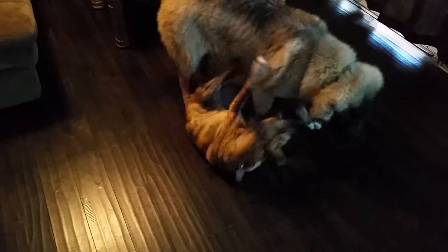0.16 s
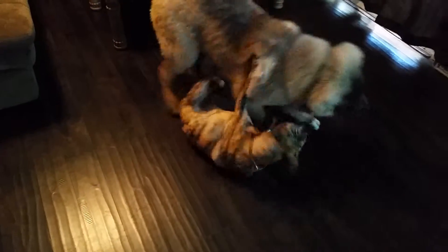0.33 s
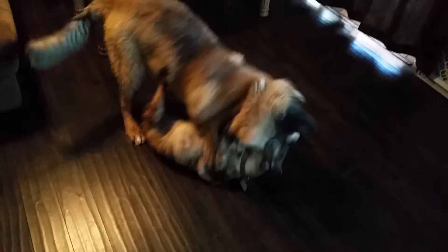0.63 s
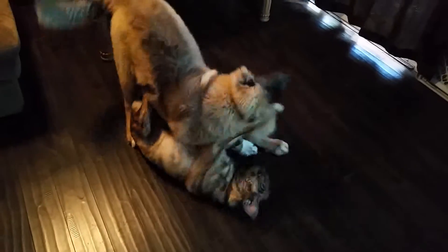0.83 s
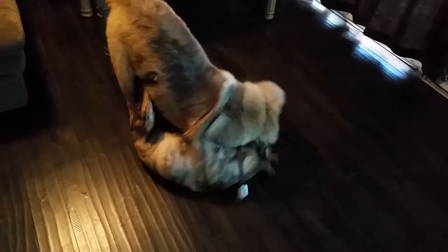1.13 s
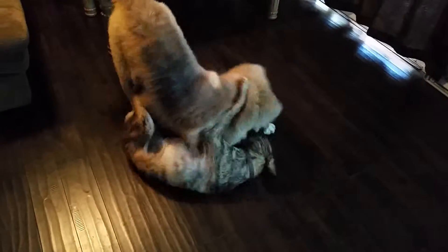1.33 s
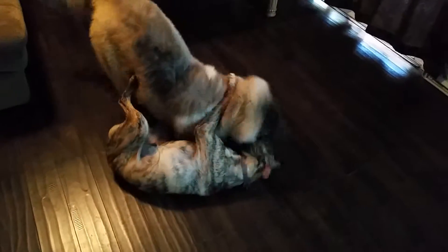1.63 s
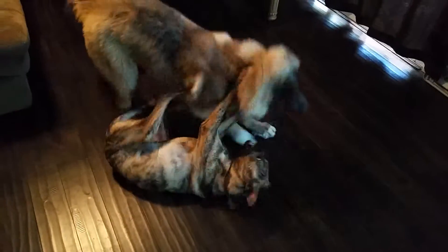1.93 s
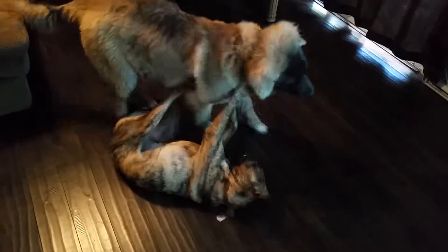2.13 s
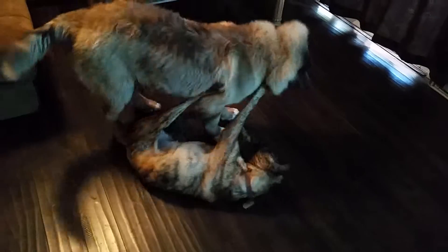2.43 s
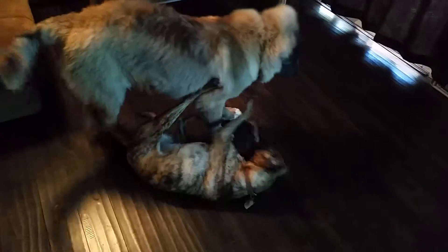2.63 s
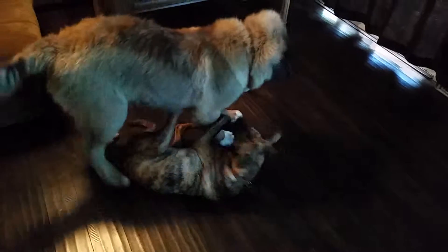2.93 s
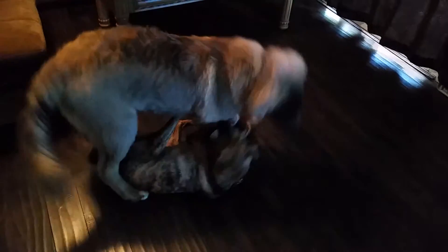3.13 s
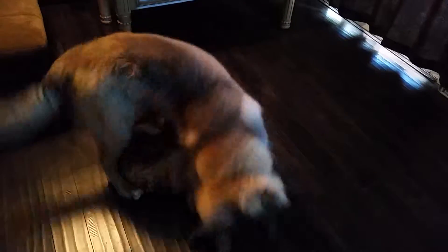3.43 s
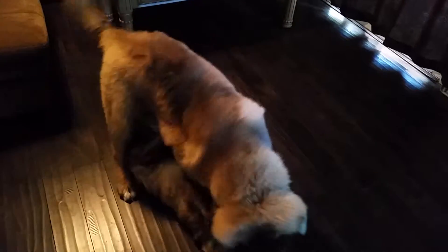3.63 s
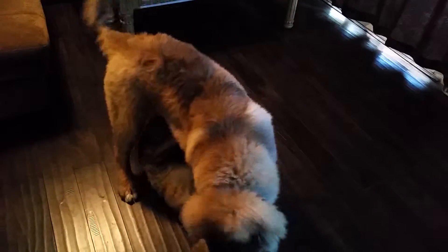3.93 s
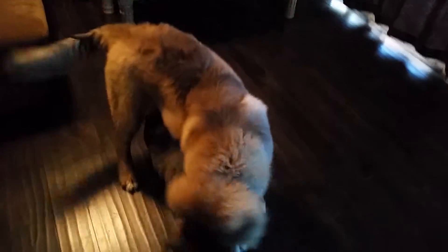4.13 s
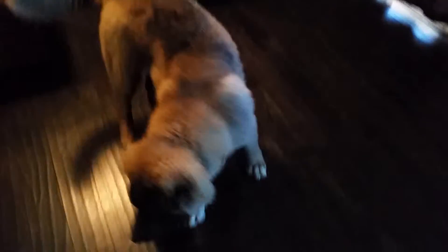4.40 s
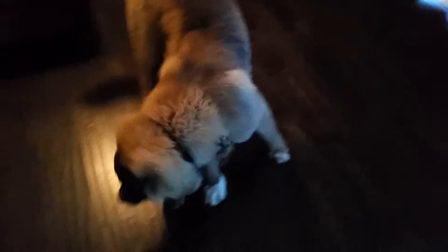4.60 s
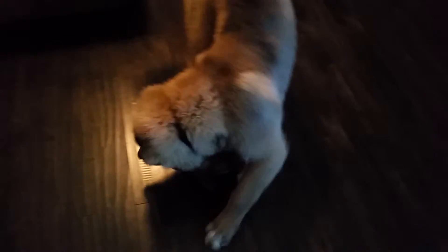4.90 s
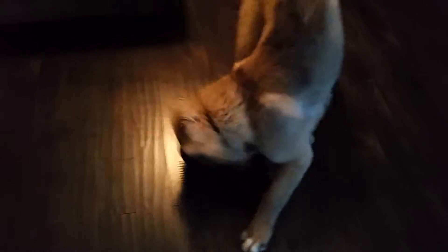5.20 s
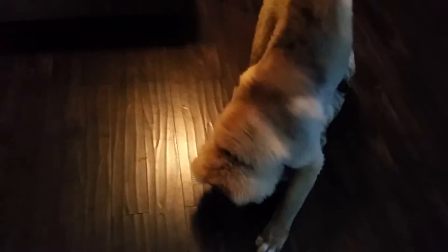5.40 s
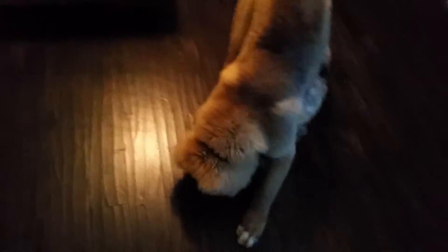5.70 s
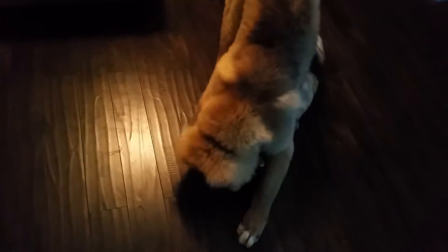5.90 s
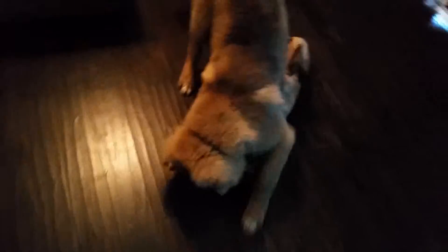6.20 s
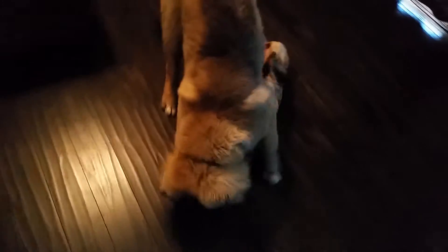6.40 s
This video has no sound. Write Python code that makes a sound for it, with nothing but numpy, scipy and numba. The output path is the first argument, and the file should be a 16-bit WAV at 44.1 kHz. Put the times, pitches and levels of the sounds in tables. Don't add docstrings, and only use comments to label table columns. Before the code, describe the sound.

Two puppies growl in rough, throaty bursts while wrestling on a wooden floor, with metal collar tags clinking, claws ticking and scraping, and soft body thumps.

```python
import sys
import numpy as np
from scipy import signal
from scipy.fft import rfft, irfft
from scipy.io import wavfile
from scipy.ndimage import uniform_filter1d
from numba import njit

SR = 44100
rng = np.random.default_rng(int(sys.argv[2]) if len(sys.argv) > 2 else 0)


def gain_from_db(level_db):
    decades = np.asarray(level_db, float) / 20
    return 10 ** decades


def log_audio(samples):
    frames = np.atleast_2d(samples).T
    limited = np.clip(frames, -1, 1)
    pcm = np.round(limited * 32767).astype(np.int16)
    wavfile.write(sys.argv[1], SR, pcm)


N = 288855
T = np.arange(N) / SR
SLOW = T[::64]


def vocal_folds():
    # time in seconds, level in dB.
    efforts = [
        [(0.24, -71.5), (0.256, -37), (0.304, -22), (0.566, -21), (0.618, -32), (0.666, -17.5), (0.82, -44)],
        [(1.0, -49.5), (1.038, -24), (1.114, -22), (1.148, -28), (1.338, -23.5), (1.46, -48)],
        [(1.68, -72.5), (1.692, -37.5), (1.72, -29), (1.768, -24), (1.876, -34), (2.0, -30), (2.09, -48)],
        [(2.12, -49), (2.18, -36.5), (2.26, -47.5)],
        [(2.47, -77), (2.51, -36), (2.56, -20), (2.65, -24), (2.9, -29.5), (3.088, -25.5), (3.25, -26),
         (3.322, -47)],
        [(3.34, -44), (3.394, -28.5), (3.44, -58)],
        [(3.5, -44.5), (3.54, -19.5), (3.61, -18), (3.69, -20), (3.77, -30), (3.81, -46)],
        [(4.0, -46), (4.115, -50), (4.135, -27), (4.2, -23.5), (4.432, -17.5), (4.556, -19), (4.69, -42)],
        [(4.95, -36.5), (4.985, -23.5), (5.206, -19.5), (5.332, -25.5), (5.375, -27), (5.44, -57.5)],
        [(5.64, -45.5), (5.742, -27.5), (5.756, -23), (6.112, -22), (6.154, -23.5), (6.27, -45.5),
         (6.55, -44.5)],
    ]
    # slaps a second, unevenness 0-1, level of every second slap in dB.
    voices = [(230, .11, -3), (215, .15, -4), (222, .08, -3), (228, .2, -3), (226, .08, -3), (228, .13, -3),
              (205, .16, -5), (200, .16, -6), (218, .09, -4), (214, .09, -9)]
    # throat resonance in Hz, lower snarl resonance at start and end in Hz, upper one likewise.
    throats = [(450, 1480, 1520, 2000, 2180), (400, 1460, 1520, 1950, 2150), (440, 1500, 1500, 1980, 2030),
               (440, 1300, 1300, 2000, 2000), (447, 1480, 1450, 1850, 2150), (447, 1460, 1460, 2100, 2100),
               (480, 1420, 1620, 1980, 2250), (400, 1500, 1600, 1980, 2180), (435, 1560, 1640, 1930, 2330),
               (430, 1480, 1530, 1750, 1980)]
    # mouth resonance at start and end in Hz, then chest, snarl and throat in dB re level.
    mouths = [(684.4, 746.5, -1, -5.5, -4.5), (701.3, 785.6, -1.5, -6.5, -1.5), (758, 821, 3, -7.5, -3.5),
              (743, 781, -17.5, 0.5, -12), (698, 720, 1, -7.5, -2.5), (787, 832, -15, -8.5, -12.5),
              (737, 760, 1.5, -7, -2), (772, 846, -2, -12, -9.5), (748, 821.6, 2, -15.5, -1.56),
              (767.3, 769, -2.5, -11.5, -1.5)]
    upper_lifts = [1.5, 0.1, -5, 0.1, -3, 0.1, 2.5, 0.1, 4, -2.5]
    usual_db = -23
    chest_steady, throat_steady = 0.414, 0.269
    snarl_grows_db, snarl_late_s = 2.5, 0.025
    # effort dB; mouth Hz; chest, snarl, throat dB; throat, lower and upper snarl Hz; upper snarl dB
    tracks = np.zeros((9, N)) + np.array([[-120, 700, 0, 0, 0, 440, 1500, 2050, 0]]).T
    slaps = np.zeros(N)
    for points, voice, throat, mouth, lift_db in zip(efforts, voices, throats, mouths, upper_lifts):
        s, effort_db = np.transpose(points)
        rate, uneven, second_db = voice
        throat_hz, lower_start, lower_end, upper_start, upper_end = throat
        open_hz, close_hz, chest_db, snarl_db, throat_db = mouth
        on = T >= s[0]
        since = T[on] - s[0]
        along = np.clip(since / (s[-1] - s[0]), 0, 1)
        effort = np.interp(T[on], s, effort_db)
        dip = np.clip(usual_db - effort, -5, 12) * np.where(effort > -40, 1, -.5)
        late_db = 12 * np.clip(2 - since / snarl_late_s, 0, 1)
        tracks[0, on] = effort - 900 * np.clip(T[on] - s[-1], 0, 1)
        tracks[1, on] = open_hz + (close_hz - open_hz) * along
        tracks[2, on] = chest_db + chest_steady * dip
        tracks[3, on] = snarl_db + snarl_grows_db * (along - .5) - late_db
        tracks[4, on] = throat_db + throat_steady * dip
        tracks[5, on] = throat_hz
        tracks[6, on] = lower_start + (lower_end - lower_start) * along
        tracks[7, on] = upper_start + (upper_end - upper_start) * along
        tracks[8, on] = lift_db
        chance = rng.standard_normal((260, 3)).T
        drift = .18 * uniform_filter1d(chance[2], 25)
        times = s[0] + np.cumsum(np.exp(uneven * chance[0] + drift) / rate)
        size = gain_from_db(2.5 * chance[1] + second_db * (np.arange(260) % 2))
        heard = times < s[-1] + .03
        slaps += strikes(times[heard], size[heard])
    return slaps, tracks


def throbs(db):
    # time in seconds, peak level in dB.
    catches = [(0.262, -24), (0.294, -11), (0.328, -8), (0.366, -10), (0.407, -8), (0.449, -8),
               (0.484, -11), (0.528, -9), (0.632, -14), (1.016, -23), (1.098, -15), (1.274, -17),
               (1.313, -16), (1.697, -27), (1.755, -14), (1.809, -16), (2.518, -18), (2.55, -14),
               (2.631, -14), (2.68, -14), (2.731, -14), (2.765, -14), (2.82, -15), (2.855, -15),
               (2.89, -16), (2.946, -14), (2.981, -15), (3.026, -14), (3.122, -14), (3.159, -14),
               (3.223, -11), (3.373, -21), (3.536, -14), (3.659, -12), (4.132, -18), (4.171, -14),
               (4.223, -15), (4.273, -15), (4.331, -12), (4.381, -9), (4.424, -10), (4.524, -8),
               (4.584, -14), (5.017, -16), (5.094, -15), (5.145, -13), (5.216, -10), (5.268, -12),
               (5.333, -17), (5.75, -10), (5.794, -12), (5.856, -13), (5.897, -12), (5.968, -15),
               (6.002, -14), (6.078, -12), (6.11, -10), (6.155, -13)]
    crest_db, fade_s, catch_db = 7, 0.03, 7.5
    throb = np.zeros(N)
    for s, peak_db in catches:
        k = int((s - .003) * SR)
        surge_db = np.clip(peak_db - db[k + 500] - crest_db, 0, 6)
        throb[k:k + 6000] = surge_db * np.exp(-T[:6000] / fade_s)
        throb[k - 700:k] -= catch_db * np.arange(700) / 700
    return uniform_filter1d(throb, size=130)


def growl():
    # frequency in Hz, T60 in seconds, level in dB.
    low_modes = [(99.3, 0.3, -7), (142, 0.25, -6), (168, 0.12, -7), (221, 0.25, -1), (300, 0.08, -11)]
    upper_modes = [(436.3, 0.42, -12), (457.5, 0.353, -5), (701.9, 0.155, -1.5), (806.2, 0.202, -11.5),
                   (879.4, 0.187, -1)]
    chest_throb, patchy_db = .3, 2.5
    slaps, tracks = vocal_folds()
    db, mouth, chest_db, snarl_db, throat_db, throat, lower, upper, upper_db = tracks
    jaw = uniform_filter1d(rng.standard_normal((2, N)), 2500, axis=1) * 50
    mouth = mouth * (1 + 0.0203 * jaw[0])
    lower = lower * (1 + .025 * jaw[0])
    upper = upper * (1 + .025 * jaw[1])
    throb = throbs(db)
    db = uniform_filter1d(db, size=160) + throb
    chest_db = chest_db - (1 - chest_throb) * throb
    puff = signal.lfilter([1], [1, -.99], slaps) * rng.standard_normal(N)
    folds = level(slaps.mean() - slaps, 0) + level(puff, -10)

    def twice(hz, width_hz):
        return level(svf(svf(folds, hz, width_hz), hz, 1.627 * width_hz), 0)

    mid = level(twice(mouth, 85.0) + gain_from_db(-7.0) * twice(1.153 * mouth, 122.4), 0)
    mid = mid + gain_from_db(throat_db) * twice(throat, 112.0)
    chest = sum(gain_from_db(d) * level(ring(folds, hz, t60), 0) for hz, t60, d in low_modes)
    chest = chest + gain_from_db(5.5) * level(band(folds, 68, 230, order=3), 0)
    snarl = gain_from_db(patchy_db * walk(12)) * twice(lower, 220.0)
    snarl = snarl + gain_from_db(upper_db + patchy_db * walk(12)) * twice(upper, 170.0)
    snarl = snarl + gain_from_db(-3) * level(band(folds, 1000, 2700), 0)
    voice = mid + gain_from_db(chest_db) * level(chest, 0) + gain_from_db(snarl_db) * level(snarl, 0)
    voice = band(voice * gain_from_db(db + 0.8), 58.8, 9200)
    answer = 0
    for hz, t60, d in upper_modes:
        gain = np.log(1000) / (t60 * SR)
        answer = answer + gain_from_db(d + 6.5) * gain * ring(voice, hz, t60)
    return voice + answer


def tags():
    mode_hz = [4685, 6395, 7065, 7495, 7916, 9950, 10835, 11440, 13215, 13725, 14385, 15100]
    mode_tag = [0, 0, 1, 1, 1, 2, 2, 2, 2, 2, 2, 2]
    # T60 of the mode in seconds, level in dB.
    mode_decay = [(0.131, 5.5), (0.11, 7), (0.125, 5), (0.093, 2.5), (0.2, -0.5), (0.17, -2.5), (0.104, -3),
                  (0.067, -4.5), (0.13, 4.5), (0.08, -4), (0.15, -0.5), (0.146, 1.5)]
    # time in seconds, level in dB on the large, middle and small tag.
    clinks = [(0.0232, -45.5, -40.5, -55), (0.042, -30, -19, -24), (0.1247, -41, -29.5, -28.5),
              (0.1953, -28, -22, -17), (0.3053, -34.5, -46.5, -38), (0.5721, -32, -25, -20.5),
              (0.626, -27, -27.5, -16), (0.6806, -35, -28.5, -45.5), (0.826, -29.5, -28.5, -35),
              (0.8929, -39.5, -37, -31.5), (0.9226, -34.5, -41.5, -31.5), (1.1748, -40, -47, -36.5),
              (1.308, -33, -29.5, -34), (1.326, -45, -42, -31), (1.3613, -33, -38, -35),
              (1.384, -40, -42, -24), (1.41, -38, -42, -36), (1.7096, -46, -47, -37.5),
              (2.0187, -41, -41.5, -31.5), (2.13, -35, -30, -34.5), (2.2051, -36.5, -34, -38.5),
              (2.2521, -29, -24, -21.5), (2.465, -19, -33.5, -25), (2.481, -18, -38, -30),
              (2.4994, -24.5, -39.5, -28), (2.5996, -38.5, -36, -47), (2.791, -36, -42.5, -34),
              (2.9814, -38.5, -35, -32), (3.2649, -47.5, -42.5, -42.5), (3.3343, -54.5, -48.5, -46),
              (3.3719, -55, -52, -61), (3.457, -33.5, -31, -25), (3.487, -38, -27, -27),
              (3.51, -42, -36, -28)]
    s, *group_db = np.transpose(clinks)
    out = 0
    rebound = np.cumsum(rng.uniform(.003, .022, (len(s), 6)), axis=1)
    when = np.concatenate([s, (s[:, None] + rebound).ravel()])
    for hz, tag, (t60, db) in zip(mode_hz, mode_tag, mode_decay):
        first = group_db[tag] + db + 1.5 * rng.standard_normal(len(s))
        later = first[:, None] - 1.5 - 100 * rebound + 3.5 * rng.standard_normal(rebound.shape)
        blows = strikes(when, gain_from_db(np.concatenate([first, later.ravel()])))
        swing = gain_from_db(3 * walk(35))
        pair = ring(blows, hz, t60) + .6 * ring(blows, 1.004 * hz, .4 * t60)
        out = out + swing * pair
    return out * gain_from_db(-9)


def knocks():
    # start in seconds, peak in dB, colour in Hz, top in dB re peak, scratch length in seconds.
    blows = [(0.0234, -12.5, 2700, -9, 0.04), (0.577, -7.5, 3280, -13.5, 0.0091),
             (0.823, -12.5, 3056, -3.5, 0.0253), (0.8916, -17, 2770, -8.5, 0.0117),
             (0.928, -18, 3780, 5.5, 0.021), (1.3053, -30.5, 4400, -12.5, 0.0193),
             (1.3634, -23, 4160, 2.5, 0.0214), (2.256, -26.5, 3540, 10.5, 0.0134),
             (2.46, -19.5, 4200, -8.5, 0.0178), (2.98, -31.5, 3830, 4, 0.013),
             (3.456, -14, 2950, -4.5, 0.018), (4.003, -22, 3060, -7.5, 0.0393), (4.045, -30, 4400, 4, 0.03),
             (4.205, -36, 4400, 1.5, 0.02), (4.268, -32, 5500, -4, 0.01), (4.382, -30, 5000, -8, 0.015),
             (4.525, -31, 5500, -8, 0.012), (5.265, -30, 6200, -15, 0.015), (5.337, -31, 6200, -12, 0.01),
             (4.219, -25, 3940, -37.5, 0.0153), (4.476, -23, 4400, -20, 0.0284),
             (5.5252, -30.5, 2890, 2.5, 0.027), (5.5407, -26, 4320, -9, 0.044),
             (5.578, -9, 2450, -24, 0.028), (6.02, -30.5, 3430, -21.5, 0.012),
             (6.351, -46, 2850, 3.5, 0.0193)]
    out, t = np.zeros(N + 8192), np.arange(8192) / SR
    for s, db, hz, top_db, length in blows:
        noise = rng.standard_normal(8192)
        colour = 2.49 * band(noise, 0.55 * hz, 1.4 * hz)
        colour = colour + gain_from_db(top_db + 6) * band(noise, 9380, 19800)
        colour = colour + gain_from_db(4.0) * band(noise, 168, 1590, order=1)
        decay = 1.45 * np.exp(-t / 0.00118) + np.exp(-t / max(length, .002))
        k = int(s * SR)
        out[k:k + 8192] += gain_from_db(db - 7) * colour * decay
    return out[:N]


def scuffle():
    # start in seconds, level in dB, seconds to fade 20 dB,
    # low part and top part in dB re level.
    scrapes = [
        (0.025, -57.5, 0.2, 19.5, 4),
        (0.575, -40.5, 0.0842, 23.5, 16.5),
        (0.83, -32, 0.071, 10.5, 5.5),
        (0.92, -39.5, 0.166, 8, 7.5),
        (2.465, -40, 0.2775, 3, 4.5),
        (3.46, -40, 0.15, 8, 18.5),
        (4.005, -40, 0.25, 6.5, 3),
        (5.53, -43, 0.0908, 0, 17),
        (5.578, -58, 0.15, 36, -2),
    ]
    # middle in seconds, level in
    # dB, seconds either side to fade 20 dB, low part and top part in dB re level.
    rubs_and_breaths = [(0.48, -47, 0.3144, -7.5, -0.5), (0.71, -42.5, 0.0571, 11, -30), (1.2, -49.5, .3, 8, -2.5),
                        (1.385, -42.5, 0.0613, 3, 11), (1.92, -51.5, 0.27, 8, 1.5), (2.2, -48.5, 0.2134, 7.5, 1.5),
                        (2.41, -47.5, 0.2738, -3, -0.5), (2.68, -50, 0.247, 7.5, -11.5), (3.299, -50, 0.12, 9.5, 1),
                        (3, -53.5, 0.32, -4.5, -2.5), (3.66, -44.5, 0.193, 11, -10), (4.27, -45.5, 0.1423, 6, -3.5),
                        (4.46, -42, 0.204, 8.5, 0), (4.8, -65, 0.26, 15, -18.5), (5.07, -50, 0.142, 12, 2.5),
                        (5.27, -42.5, 0.1651, 6.5, -1), (5.95, -55, .5, 8, -27.5)]
    # frequency in Hz, width in Hz, level in dB.
    fur = [
        [(4550, 900, 2), (5300, 900, -1), (6300, 900, 6), (7300, 1200, 1.5), (8300, 1200, -0.8)],
        [(1000, 1100, -6), (2250, 800, -2.5), (2900, 900, -2.5), (3700, 1000, -9)],
        [(9400, 1200, -4), (10800, 1600, -5), (12700, 1800, -7), (14600, 2200, -8.5)],
    ]
    still_db = [-71, -62, -80]
    attack_s, rub_edge, patchy_db = 0.0111, 2.79, 2.5
    power = np.zeros((3, len(SLOW))) + gain_from_db(2 * np.array(still_db))[:, None]
    for s, db, fade, low_db, top_db in scrapes:
        attack = np.clip((SLOW - s) / attack_s, 0, 1)
        shape = attack * gain_from_db(db - 20 * np.clip(SLOW - s, 0, 2) / fade)
        power += (gain_from_db(np.array([[0], [low_db], [top_db]])) * shape) ** 2
    for s, db, fade, low_db, top_db in rubs_and_breaths:
        shape = gain_from_db(db - 20 * np.clip(np.abs(SLOW - s) / fade, 0, 10) ** rub_edge)
        power += (gain_from_db(np.array([[0], [low_db], [top_db]])) * shape) ** 2
    contact = rng.random(N) < 2500 / SR
    grain_db = np.minimum(6.33 * rng.exponential(1, N), 16)
    grains = contact * gain_from_db(grain_db) * rng.standard_normal(N)
    grit = level(grains, 0) + rng.standard_normal(N)

    def patch(hz, width_hz, db):
        moving = hz * (1 + .03 * walk(5))
        steep = svf(svf(grit, moving, 1. * width_hz), moving, 1. * width_hz)
        return level(steep, db) * gain_from_db(patchy_db * walk(11))

    out = 0
    for p, part in zip(power, fur):
        out = out + np.interp(T, SLOW, np.sqrt(p)) * sum(patch(*row) for row in part)
    return out


def background():
    # frequency in Hz, level in dB per Hz.
    hush_colour = [(15, -60.5), (25, -48.5), (130, 5.5), (180, -13.5), (734, -15.5), (796, -16.5),
                   (936, -9), (1480, -22), (1610, -14.5), (3430, -28.5), (16000, -40.5)]
    # middle in seconds, level in dB, seconds either side to fade 20 dB.
    thumps = [
        (0.02, -36, 0.1),
        (0.73, -47, 0.27),
        (2.24, -48, 0.56),
        (3.15, -39.5, 0.34),
        (3.57, -30.5, 0.16),
        (4.49, -51.5, 0.18),
        (5.07, -39, 0.3),
        (5.62, -47, 0.2),
        (6.31, -46.5, 0.33),
    ]
    hush_db, hum_hz, hum_db, rest_db = -45, 120.28, -43.5, -61
    hz = np.fft.rfftfreq(N, 1 / SR)
    mid, side = rfft(rng.standard_normal((2, N))) * gain_from_db(on_log(hush_colour, hz))
    side = side * np.clip(hz / 1000, .1, 1)
    hush = irfft(np.array([mid + side, mid - side]), N)
    hush = hush * gain_from_db(hush_db) / np.std(band(hush[0], 283, 12000))
    wobble = 0.5 + 0.154 * level(band(rng.standard_normal(N), 0.99, 24, order=1), 0)
    hum = gain_from_db(hum_db + 4.5) * wobble * np.sin(2 * np.pi * hum_hz * T)
    rumble = level(band(rng.standard_normal(N), 18.7, 43.4, order=3), 0) * swells(thumps, rest_db)
    return hush + hum + rumble


def room(x, room_db):
    places = 9
    step = N // (places - 1) + 1
    out, wide = np.zeros((2, N + 2 * SR + 2 * step)), np.pad(x, (step, 2 * step))
    fade = np.sin(np.pi * np.arange(2 * step) / (2 * step))
    for k in range(places):
        piece = wide[k * step:(k + 2) * step] * fade
        echoes = [signal.fftconvolve(piece, echo) for echo in tail(room_db)]
        out[:, k * step:(k + 2) * step + SR // 2 - 1] += echoes
    return x + out[:, step:step + N]


def tail(room_db):
    low_t60_s, top_t60_s = 0.5074, 0.23
    t = np.arange(SR // 2) / SR
    noise = rng.standard_normal((2, len(t)))
    noise = noise - 0.372 * band(noise, 55, 706, order=1)
    lows = band(noise, 50.7, 1930, order=1)
    fade = lambda t60: np.exp(-np.log(1000) * t / t60) * (t > .004)
    mid, side = lows * fade(low_t60_s) + (noise - lows) * fade(top_t60_s)
    side = 1.45 * band(side, 850, 14840)
    tails = np.array([mid + side, mid - side])
    return tails * gain_from_db(room_db) / np.sqrt(np.mean(np.sum(tails ** 2, axis=1)))


def level(x, db):
    return x * gain_from_db(db) / np.sqrt(np.mean(x ** 2))


def band(x, lo_hz, hi_hz, order=2):
    return signal.sosfilt(signal.butter(order, [lo_hz, hi_hz], "band", fs=SR, output="sos"), x)


def on_log(table, hz):
    f, v = np.transpose(table)
    return np.interp(np.log(hz + 1), np.log(f), v)


def ring(x, hz, t60):
    pole = np.exp(2j * np.pi * hz / SR - np.log(1000) / (t60 * SR))
    return signal.lfilter([0, pole.imag], [1, -2 * pole.real, abs(pole) ** 2], x)


def strikes(s, size):
    return np.bincount((np.asarray(s) * SR).astype(int), size, N)[:N]


@njit
def svf(x, hz, width):
    y, b, l = np.empty(len(x)), 0., 0.
    for i in range(len(x)):
        g, k = np.tan(np.pi * hz[i] / SR), width / hz[i]
        v = (b + g * (x[i] - l)) / (1 + g * (g + k))
        b, l, y[i] = 2 * v - b, l + 2 * g * v, k * v
    return y


def swells(rows, rest_db):
    power = gain_from_db(2 * rest_db)
    for s, db, wide in rows:
        power = power + gain_from_db(2 * db - 40 * np.abs(SLOW - s) / wide)
    return np.interp(T, SLOW, np.sqrt(power))


def walk(rate):
    k = int(SR / 64 / rate)
    slow = uniform_filter1d(uniform_filter1d(rng.standard_normal(len(SLOW)), k), k)
    return np.interp(T, SLOW, slow / slow.std())


def scene():
    animals = room(growl() + knocks() + scuffle(), -3)
    return gain_from_db(-3.5) * (animals + room(tags(), -1.5)) + background()


def top_cut(x):
    return signal.sosfilt(signal.butter(12, 16810, fs=SR, output="sos"), x)


def record(dry):
    # frequency in Hz, difference in dB.
    port_colour = [(60, -4), (300, -3.5), (700, -0.5), (1290, 0), (2380, -6), (4400, 8.5), (8120, 1.5),
                   (15000, -7)]
    # frequency in Hz, gain in dB.
    mic_colour = [(260, -0.2958), (310, -3.5), (370, -1.5), (550, 3), (1050, -2), (1250, -5.5), (1500, 1),
                  (3000, -3), (5000, 1), (5550, -8), (6100, -0.5), (8100, -2), (8750, -2.5), (9500, 1)]
    port_lag, top_hz = 4, 15850
    hz = np.fft.rfftfreq(N, 1 / SR)
    dry = np.tanh(.9 * dry) / .9
    turn = np.minimum(hz * port_lag / SR, 1 / 4)
    half = gain_from_db(on_log(port_colour, hz) / 2) * np.exp(-1j * np.pi * turn)
    top = gain_from_db(on_log(mic_colour, hz)) * np.where(hz > top_hz, gain_from_db(-62), 1)
    mix = irfft(rfft(dry) * top * np.array([half, 1 / half]), N)
    return top_cut(mix)


dry = scene()
out = record(dry)
log_audio(out)
```